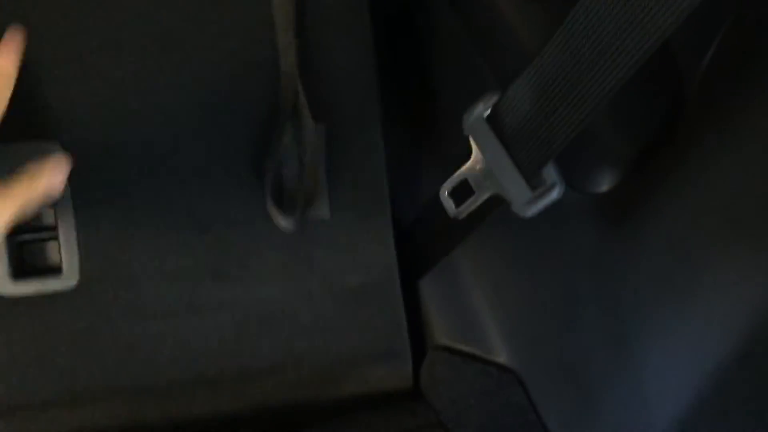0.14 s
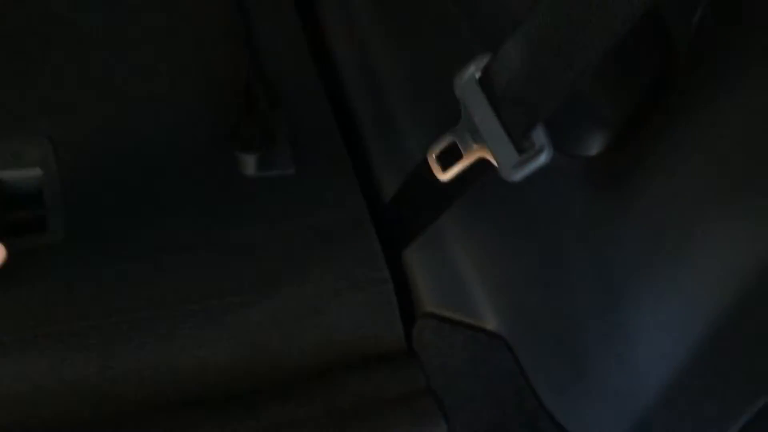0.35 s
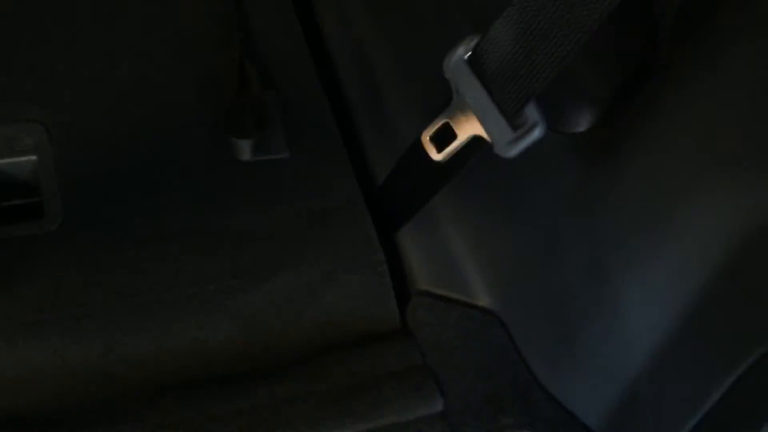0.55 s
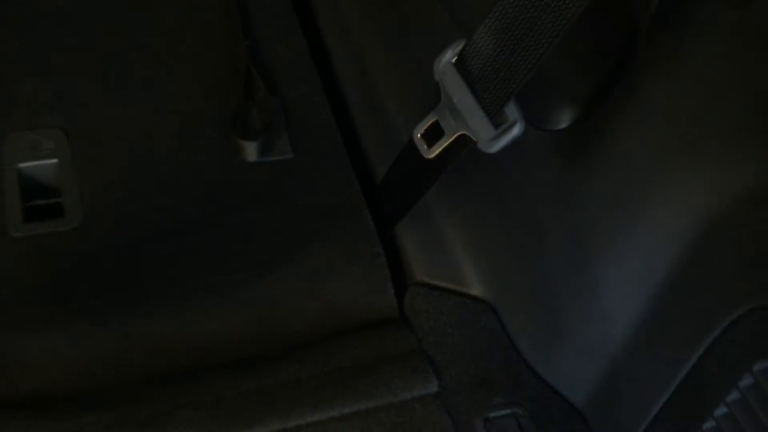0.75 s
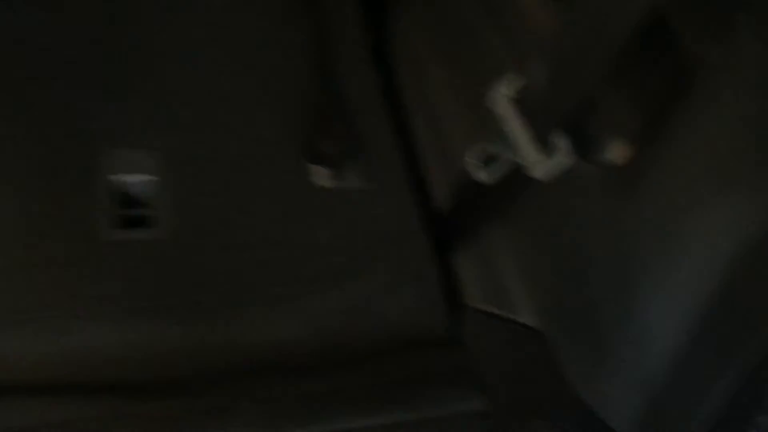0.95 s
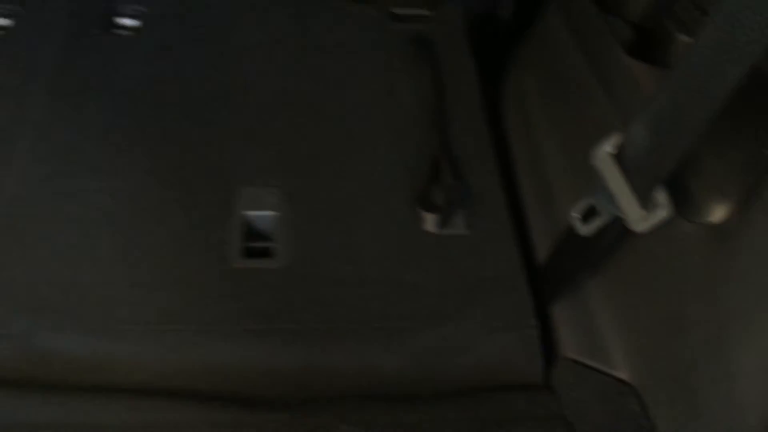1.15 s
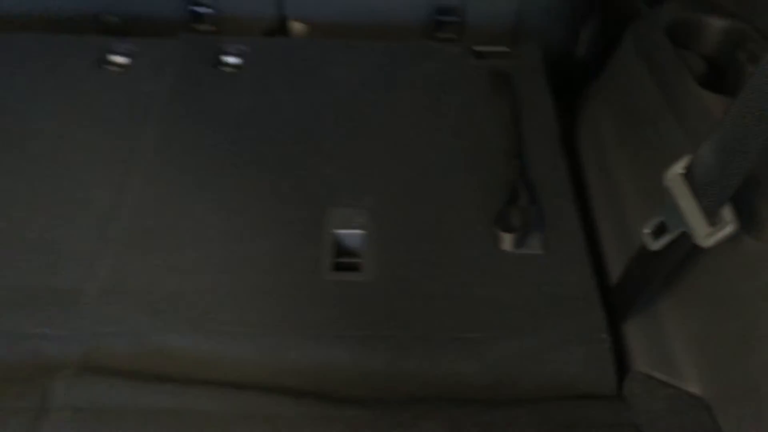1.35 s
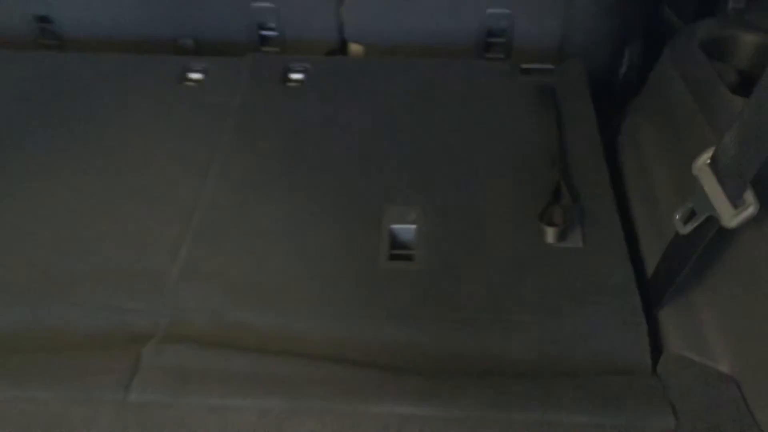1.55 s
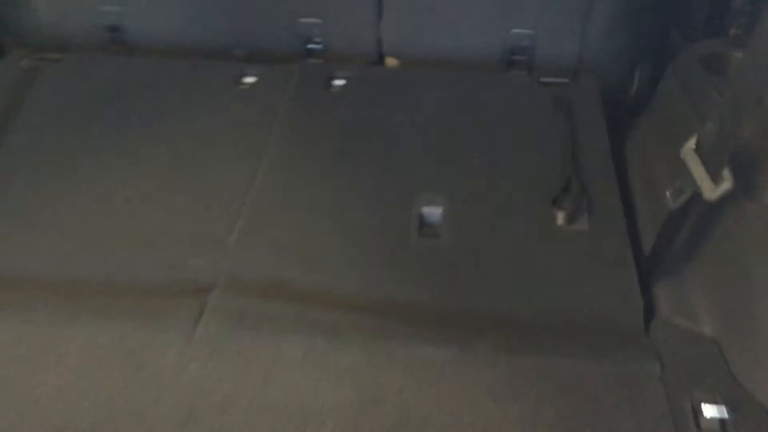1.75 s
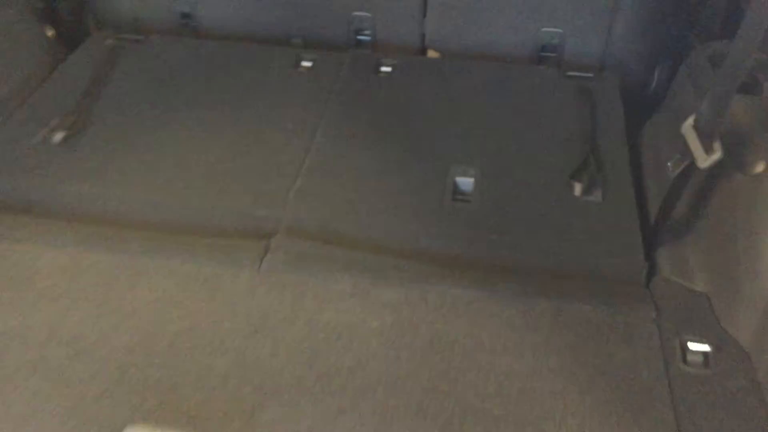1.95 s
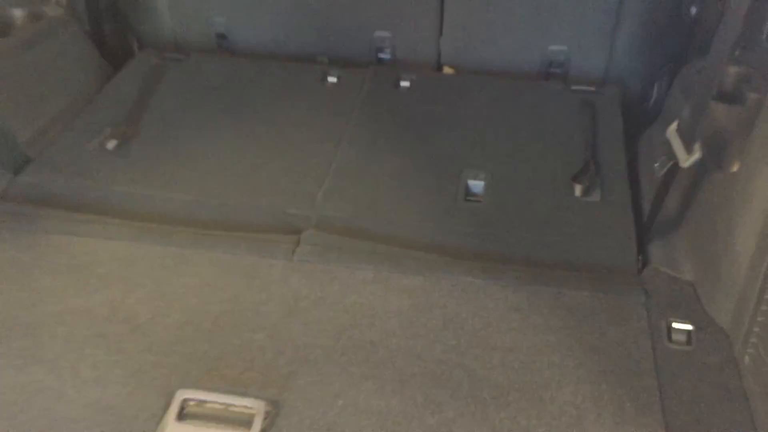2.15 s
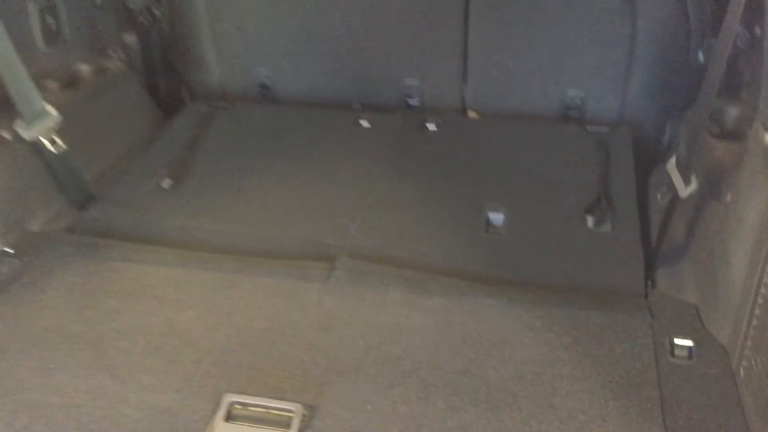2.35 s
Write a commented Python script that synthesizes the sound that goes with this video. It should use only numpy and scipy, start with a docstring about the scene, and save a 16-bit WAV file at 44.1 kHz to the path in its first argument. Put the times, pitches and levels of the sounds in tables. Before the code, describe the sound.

Seatback folding in a quiet car: fabric slide, latch clatter, soft low thud, then faint scuffs

```python
"""A car seatback is unlatched and drops flat with a thump inside a quiet cabin.
A low rumble, with hiss and a hum, lies under the scene; upholstery slides first, as friction noise in grains.
The latch then knocks and grinds, exciting metal resonances, while pushes make the padded frame boom and settle.
Faint scuffs, one early and the rest after the drop, rub and ring small loose parts; one late push is faint."""
import sys
import numpy as np
from scipy import signal
from scipy.io import wavfile

SR = 44100
rng = np.random.default_rng(int(sys.argv[2]) if len(sys.argv) > 2 else 0)


def dump_mix(stems):
    """Bounce the given channels to the path in sys.argv[1] as a 16-bit WAV at rate SR."""
    frames = np.atleast_2d(stems).T  # one column per channel
    limited = np.clip(frames, -1, 1)  # hard clip at full scale
    pcm = np.round(limited * 32767).astype(np.int16)
    wavfile.write(sys.argv[1], SR, pcm)


N = 110250  # samples, 2.5 s
RUN_IN = 8000  # samples that let the filters settle

# pushes on the padded frame: (time [s], level [dB], tilt towards the upper modes [dB per octave])
FRAME_PUSHES = [(0.206, -46, 14), (0.231, -26.5, -3), (0.266, -28, -1), (0.295, -21.5, 1),
                (0.309, -20, -1.5), (0.322, -19.5, 1.5), (0.381, -27, -8.5), (1.596, -52.5, 7)]
# modes of the padded frame and cabin: (frequency [Hz], level [dB], decay time T60 [s])
FRAME_MODES = [(52.53, -17, 1), (93.2, 0.5, 0.2), (188.7, 1, 0.12), (257, -9.5, 0.086), (342.7, -10, 0.13)]
PUSH_TOP_HZ = 485  # softness of the pushes

# latch knocks: (time [s], ring level [dB], tilt towards the upper modes [dB per octave],
# crack level [dB], crack top [Hz])
LATCH_KNOCKS = [(0.199, -42, 4, -44, 12000), (.204, -41.5, 3.5, -41, 2500), (0.2354, -62, 14.5, -37, 11400),
                (0.246, -51, -6, -41.5, 2970), (0.298, -39, -32, -41, 10100),
                (0.307, -36, -5, -42.5, 10000), (.319, -32.5, 0, -33, 4300), (0.331, -37, -7.5, -72, 3000),
                (.35, -54, -15, -50, 9000), (.366, -51, -13, -45, 6000)]
# latch housing modes: (frequency [Hz], level [dB], decay time T60 [s])
HOUSING_MODES = [(349, -9.5, 0.072), (603, 6.5, 0.019), (955, 7, 0.022), (1290, 6.5, 0.025),
                 (1790, 4, 0.016), (2436, -5, 0.028)]
CRACK_T60_S, CHATTER_S = .028, .005
# grinding of the latch metal: (time [s], level [dB])
GRIND_LEVEL = [(.234, -54), (.237, -42), (.265, -42.5), (.29, -45.5), (.308, -42.5), (.335, -72)]
# resonances of the latch metal under grinding: (frequency [Hz], width [Hz], level [dB])
GRIND_RESONANCES = [(2500, 550, 0), (5640, 270, -3.5), (9120, 550, -5)]
# the resonances swell and fade about this moment, over a broad scrape
SING_TIME_S, SING_SPREAD_S, SCRAPE_TOP_HZ = 0.2704, 0.0094, 5760

# upholstery sliding: (time [s], level [dB])
SLIDE_LEVEL = [(0, -88), (.03, -79), (.05, -61.5), (.19, -58), (.33, -59), (.37, -69), (.39, -69),
               (.445, -70), (.496, -61.5), (.525, -65.5), (.6, -64.5), (.68, -64.5), (.775, -71.5),
               (.81, -83)]
# spectrum of the sliding: (frequency [Hz], relative level [dB per Hz])
SLIDE_SPECTRUM = [(3600, -4), (5800, 7.5), (10000, 3.5), (16000, 1.5)]
SLIDE_GRAINS_PER_S = 7500
# thin tones that come and go in the slide: (frequency [Hz])
SLIDE_TONES_HZ = [5700, 6900, 9700, 11700]
SLIDE_TONE_WIDTH_HZ, SLIDE_TONE_DB = 84, -21
# frame and padding working: (time [s], level [dB])
CREAK_LEVEL = [(0, -53), (.1, -47.5), (.22, -43), (.31, -36), (.375, -42), (.41, -53), (.62, -64)]
# spectrum of the creak: (frequency [Hz], relative level [dB per Hz])
CREAK_SPECTRUM = [(220, 6.5), (1400, -13), (2400, -14.5), (3200, -22), (5500, -25.5)]

# faint scuffs and rattles: (time [s], length [s], level [dB], centre [Hz], width [octaves])
SCUFF_EVENTS = [(0.083, 0.06, -54, 2310, 0.68), (0.685, 0.063, -59, 2560, 1.33),
                (0.749, 0.14, -63.5, 3270, 1.12), (0.805, 0.03, -51.5, 2050, 0.42),
                (0.866, 0.17, -69.5, 2000, 0.38), (1.006, 0.017, -65.5, 4200, 0.56),
                (1.03, 0.069, -63.5, 2340, 1.1), (1.551, 0.08, -75, 3780, 0.08),
                (1.567, 0.076, -68, 945, 0.9), (1.76, 0.019, -58.5, 2150, 0.66),
                (1.766, 0.013, -64.5, 5530, 0.8), (1.794, 0.16, -78.5, 2940, 4.5),
                (1.934, 0.021, -61, 2070, 1.7)]
SCUFF_RISE_S, SCUFF_FADE_S = .013, .028
# resonances of small loose parts: (frequency [Hz])
LOOSE_PARTS_HZ = [1060, 1380, 1760, 2140, 2540, 3750, 4400, 6660]
RATTLE_T60_S = 0.012
RUB_DB = -1.5  # plain rubbing beside the rattle

# cabin rumble: (time [s], level [dB])
RUMBLE_LEVEL = [(0, -33.5), (.1, -44), (.55, -43), (.75, -47), (1.3, -45), (1.75, -43.5), (2.3, -42.5),
                (2.5, -44.5)]
# spectrum of the rumble: (frequency [Hz], relative level [dB per Hz])
RUMBLE_SPECTRUM = [(24, -11.5), (55, 3), (100, 2), (170, -7.5), (220, -7.5), (255, -20)]
RUMBLE_TOP_HZ = 229
# hiss of cabin air and microphone: (time [s], level [dB])
HISS_LEVEL = [(0, -66.5), (2.5, -64)]
# spectrum of the hiss: (frequency [Hz], relative level [dB per Hz])
HISS_SPECTRUM = [(250, 4), (500, -7), (1030, -5), (2000, -11.5), (3000, -19), (10000, -30), (16000, -34)]
# wavering hum: (time [s], level [dB])
HUM_LEVEL = [(0, -48.5), (1.12, -52), (1.25, -47), (1.5, -64)]
HUM_HZ, HUM_WIDTH_HZ = 168.66, 2.9

STOPBAND_HZ = 16100  # 40 dB down from here upwards


def from_db(db):
    """Decibel law: twenty decibels are a factor of ten in amplitude."""
    return 10 ** (np.asarray(db) / 20)


def rms_one(x):
    """Normalisation of the mean power: the signal is scaled to rms 1."""
    return x / np.sqrt(np.mean(x ** 2) + 1e-20)


def level(rows):
    """Amplitude envelope: gain linear in dB between rows, dropping to -120 dB within 0.1 s of the last."""
    time, db = np.transpose(rows)
    time, db = np.append(time, time[-1] + .1), np.append(db, -120)
    return from_db(np.interp(np.arange(N) / SR, time, db))


def butter(x, order, hz, kind="low"):
    """Butterworth filtering: a maximally flat pass band."""
    return signal.sosfilt(signal.butter(order, hz, kind, fs=SR, output="sos"), x)


def drift(rate):
    """Slow random modulation: noise through two equal poles at rate [Hz], scaled to rms 1."""
    step = 40  # samples between computed values
    pole = np.exp(-2 * step * np.pi * rate / SR)
    noise = rng.standard_normal(N // step + 2002)
    slow = signal.lfilter([1], [1, -2 * pole, pole * pole], noise)[2000:]
    return np.interp(np.arange(N) / step, np.arange(len(slow)), rms_one(slow))


def ring(x, hz, t60):
    """Damped resonance: a unit click sets off a decaying sine of initial height 1."""
    radius, angle = from_db(-60 / (t60 * SR)), 2 * np.pi * hz / SR
    return signal.lfilter([0, np.sin(angle)], [1, -2 * radius * np.cos(angle), radius * radius], x + 1e-18)


def ring_t60(width_hz):
    """Reciprocity of bandwidth and decay: a narrow resonance rings long."""
    return 2.2 / width_hz


def grains(rate, spread_db):
    """Granular excitation: random clicks of uneven size and either sign, with a run-in."""
    size = from_db(spread_db * np.minimum(rng.exponential(1, N + RUN_IN), 4))
    sign = rng.choice([-1, 1], N + RUN_IN)
    return size * sign * (rng.random(N + RUN_IN) < rate / SR)


def white():
    """White noise: two unrelated signals with equal power at all frequencies, with a run-in."""
    return rng.standard_normal((2, N + RUN_IN))


def coloured(spectrum, sources, patchy_db, rate):
    """Spectral shaping: third-octave bands of two alternating sources, each flickering; rms 1 in sum."""
    hz, db = np.transpose(spectrum)
    octaves = np.log2(min(hz[-1], 17000) / hz[0])
    edges = hz[0] * 2 ** np.arange(0, octaves + .3, 1 / 3)
    out = 0
    for k, (low, high) in enumerate(zip(edges, edges[1:])):
        band = butter(sources[k % 2], 2, [low, high], "band")[-N:]
        band_db = np.interp(np.log(low * high) / 2, np.log(hz), db)
        out = out + band * from_db(band_db + patchy_db * drift(rate))
    return rms_one(out)


def strike(times, db, modes, tilt_db):
    """Modal superposition: every blow excites every mode, with a random variation in strength."""
    out = 0
    for k, (hz, mode_db, t60) in enumerate(modes):
        tilt = tilt_db * np.log2(hz / modes[1][0])  # zero at the second mode
        gain = from_db(db + mode_db + tilt + 2 * rng.standard_normal(len(times)))
        clicks = np.zeros(N)
        # neighbouring modes start in opposite directions
        np.add.at(clicks, (times * SR).astype(int), gain * (-1) ** k)
        out = out + ring(clicks, hz, t60)
    return out


def padded_frame():
    """Impulse response of low modes: soft pushes, low-pass filtered, make the padded frame boom."""
    time, db, tilt_db = np.transpose(FRAME_PUSHES)
    return butter(strike(time, db, FRAME_MODES, tilt_db), 2, PUSH_TOP_HZ)


def latch_knocks():
    """Repeated impact: one strong touch on the housing, two weaker ones in either order, and a noisy crack."""
    time, ring_db, tilt_db, crack_db, top_hz = np.transpose(LATCH_KNOCKS)
    lag = CHATTER_S * rng.random((len(time), 3)) * [0, 1, 1]
    hit_times = (time[:, None] + lag).ravel()
    hit_db = (ring_db[:, None] - 4 * np.arange(3)).ravel()
    out = strike(hit_times, hit_db, HOUSING_MODES, np.repeat(tilt_db, 3))
    noise = butter(white()[0, :N], 1, 500, "high")
    t = np.arange(N) / SR
    for start, db, hz in zip(time, crack_db, top_hz):
        crack = rms_one(butter(noise, 2, hz))
        decay = from_db(db - 60 * np.maximum(t - start, 0) / CRACK_T60_S)
        out = out + crack * (t >= start) * decay
    return out


def latch_grind():
    """Resonance under friction: irregular slips excite the latch metal over a broad flickering scrape."""
    slips = grains(2500, spread_db=1.0)[:N]
    singing = sum(from_db(db) * rms_one(ring(slips, hz, ring_t60(width)))
                  for hz, width, db in GRIND_RESONANCES)
    swell = np.exp(-.5 * ((np.arange(N) / SR - SING_TIME_S) / SING_SPREAD_S) ** 2)
    scrape = rms_one(butter(slips, 1, [800, SCRAPE_TOP_HZ], "band")) * from_db(2 * drift(120))
    return level(GRIND_LEVEL) * (scrape + singing * swell)


def upholstery_slide():
    """Sliding friction: cloth moves in fine grains, which also excite thin wavering tones."""
    fine = [grains(SLIDE_GRAINS_PER_S, spread_db=-2.5) for _ in range(2)]
    tones = 0
    for hz in SLIDE_TONES_HZ:
        tone = rms_one(ring(fine[0], hz, ring_t60(SLIDE_TONE_WIDTH_HZ))[-N:])
        tones = tones + from_db(SLIDE_TONE_DB + 6 * drift(12)) * tone
    cloth = coloured(SLIDE_SPECTRUM, fine, patchy_db=2.5, rate=20)
    return level(SLIDE_LEVEL) * (cloth + tones)


def padding_creak():
    """Internal friction: frame and padding work in sparser grains of darker spectrum."""
    coarse = [grains(3000, spread_db=2.5) for _ in range(2)]
    return level(CREAK_LEVEL) * coloured(CREAK_SPECTRUM, coarse, patchy_db=2.5, rate=20)


def scuffs():
    """Selective excitation: short rubs shake the loose parts that ring near each scuff's centre."""
    t = np.arange(N) / SR
    rub = grains(3000, spread_db=-2.5)[:N]
    parts = np.array([rms_one(ring(grains(1500, spread_db=4.0)[:N], hz, RATTLE_T60_S))
                      for hz in LOOSE_PARTS_HZ])
    out = 0
    for start, length, db, hz, octaves in SCUFF_EVENTS:
        share = np.exp(-2 * (np.log2(np.array(LOOSE_PARTS_HZ) / hz) / octaves) ** 2)
        rattle = rms_one(share @ parts)
        edge = 2 ** np.clip(abs(octaves) / 2, .05, 1.2)
        rubbing = rms_one(butter(rub, 2, [hz / edge, hz * edge], "band"))
        since = np.maximum(t - start, 0)
        rise = np.minimum(since / SCUFF_RISE_S, 1)
        sag = since / (2 * abs(length))
        fade = np.maximum(since - length, 0) / SCUFF_FADE_S
        out = out + from_db(db) * rise * np.exp(-sag - fade) * (rattle + from_db(RUB_DB) * rubbing)
    return out * from_db(2 * drift(25))  # uneven strength


def cabin_rumble():
    """Band-limited noise: a flickering low spectrum, cut steeply at its top."""
    rumble = coloured(RUMBLE_SPECTRUM, white(), patchy_db=2.0, rate=8.6)
    return level(RUMBLE_LEVEL) * butter(rumble, 6, RUMBLE_TOP_HZ)


def cabin_hum():
    """Narrow-band noise: a sharp resonance driven by white noise wavers in strength."""
    hum = ring(white()[0], HUM_HZ, ring_t60(HUM_WIDTH_HZ))[-N:]
    return level(HUM_LEVEL) * rms_one(hum)


def hiss():
    """Broadband noise: cabin air and microphone give a spectrum that falls towards the treble."""
    return level(HISS_LEVEL) * coloured(HISS_SPECTRUM, white(), patchy_db=.5, rate=10)


def scene():
    """Linear superposition: the pressures of all sources add."""
    seatback = padded_frame() + latch_knocks() + latch_grind() + upholstery_slide() + padding_creak()
    background = cabin_rumble() + cabin_hum() + hiss()
    return (seatback + scuffs() + background)[None]


def record(dry):
    """Band limitation: the microphone loses the deepest bass, and the top is cut steeply."""
    firm = butter(dry, 1, 25, "high")
    return signal.sosfilt(signal.cheby2(14, 40, STOPBAND_HZ, fs=SR, output="sos"), firm)


dry = scene()
out = record(dry)
dump_mix(out)
```